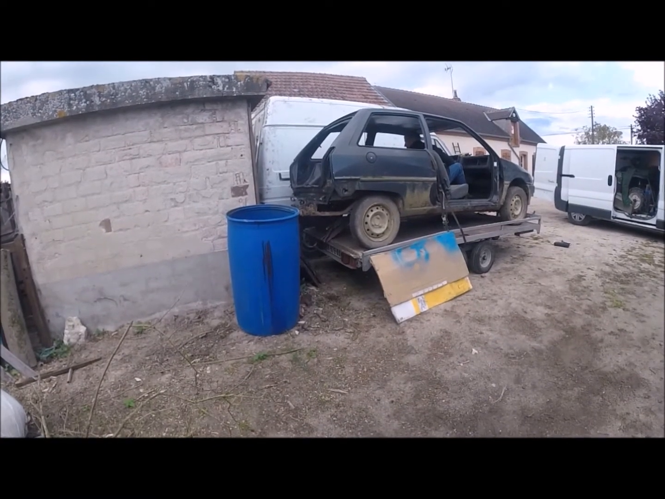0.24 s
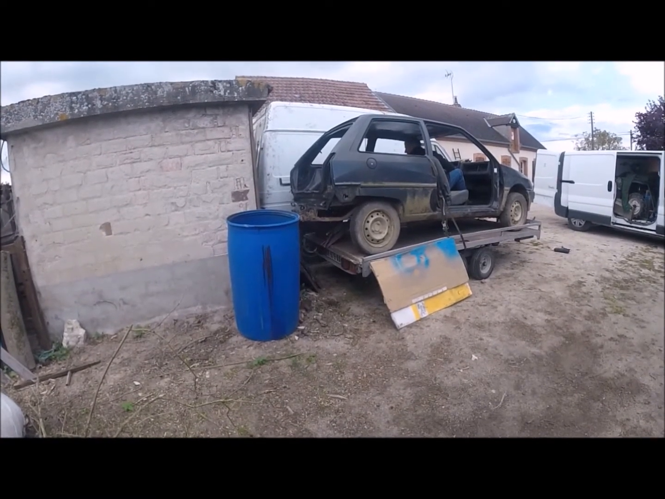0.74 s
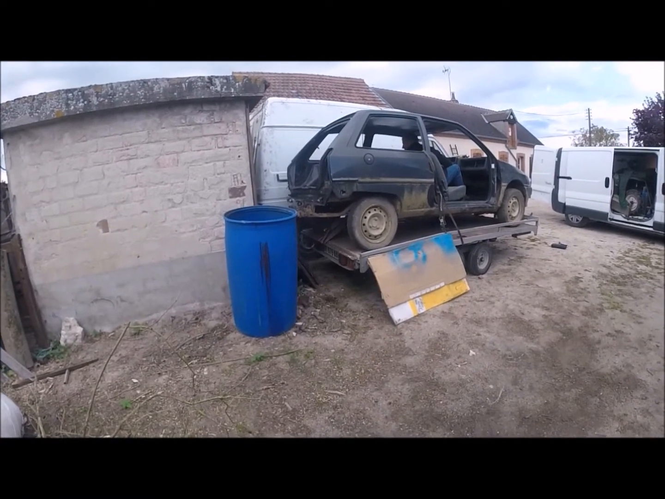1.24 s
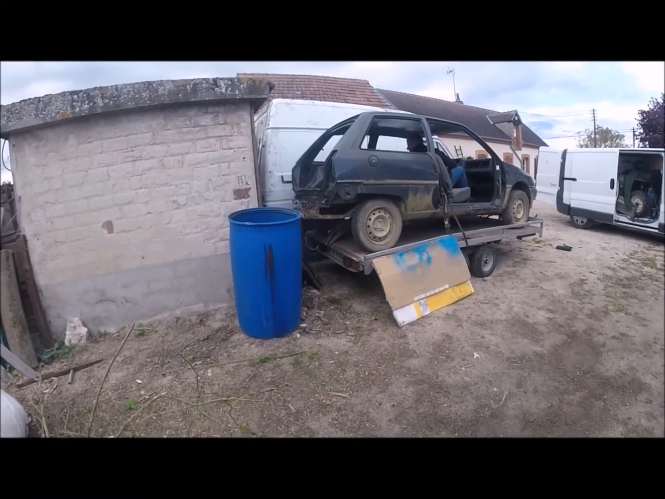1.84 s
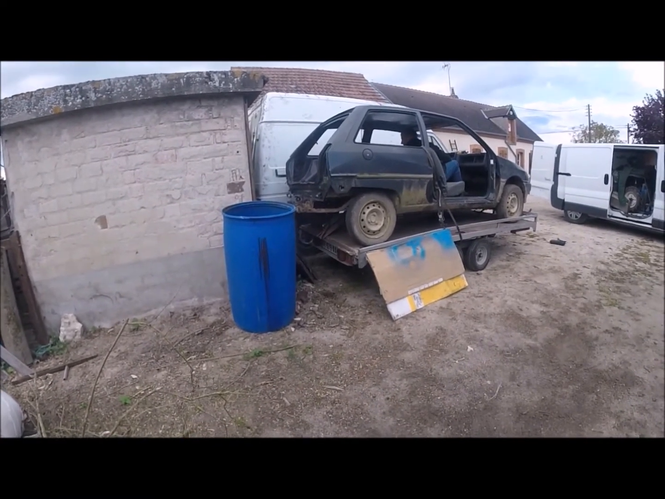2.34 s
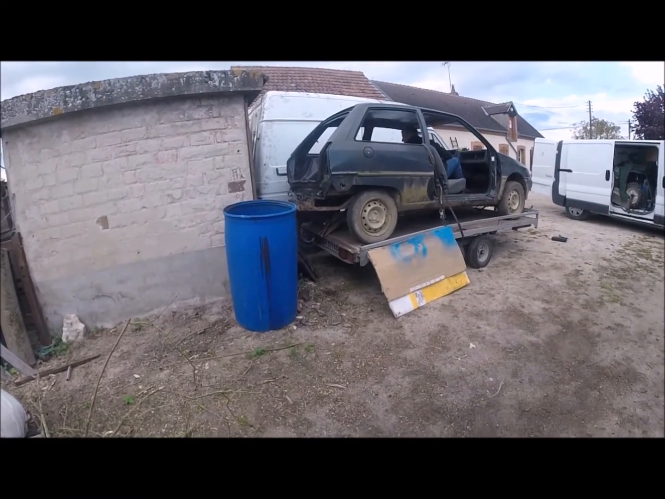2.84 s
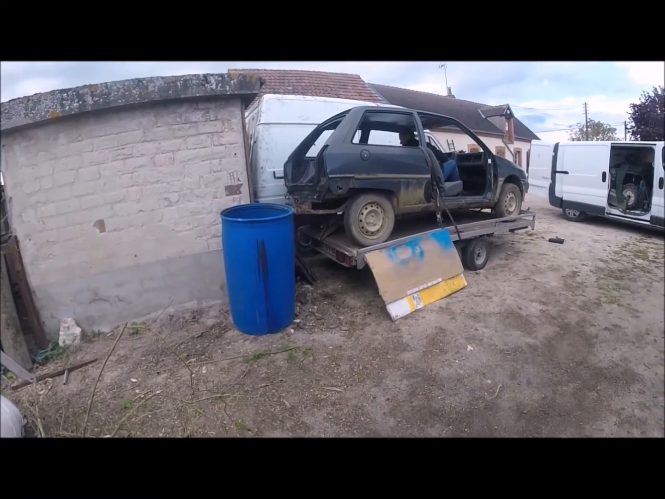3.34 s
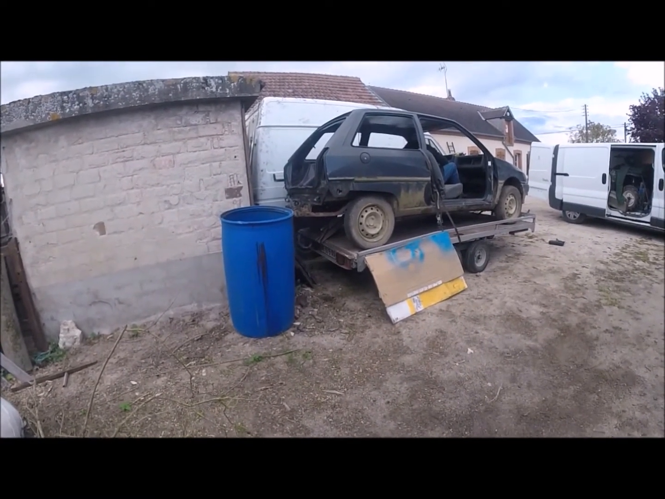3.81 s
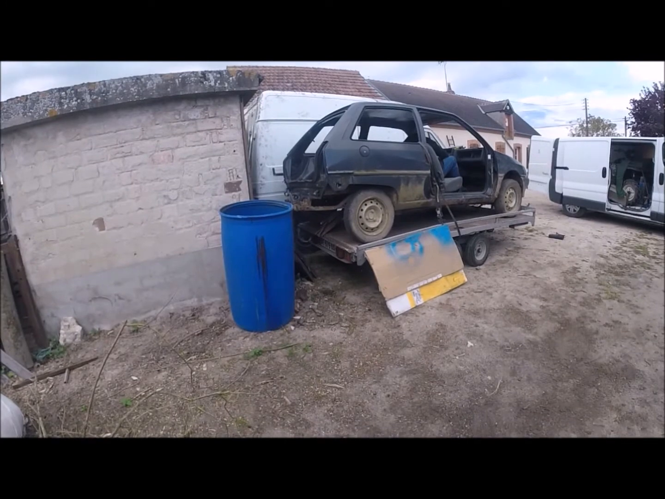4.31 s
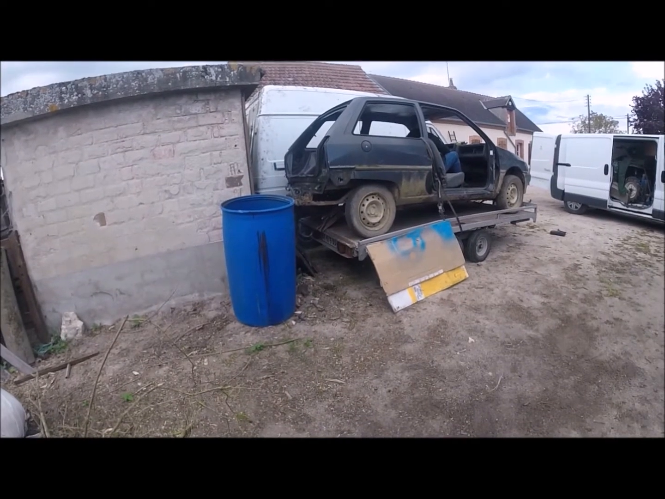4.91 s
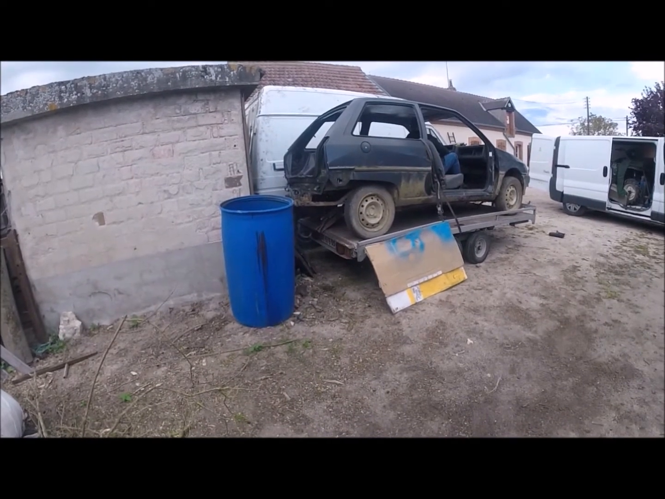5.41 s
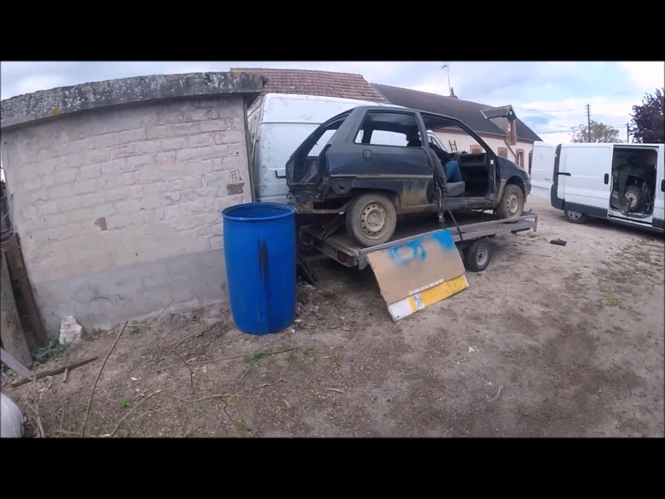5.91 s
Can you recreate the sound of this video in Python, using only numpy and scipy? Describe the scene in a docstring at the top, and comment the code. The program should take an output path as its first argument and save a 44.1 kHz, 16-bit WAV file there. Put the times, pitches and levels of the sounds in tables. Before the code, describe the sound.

Loud, torn exhaust noise from a bare small hatchback pulses on and off five times in under two seconds, each opening barking and sputtering. A long full-throttle pull follows, tense and metallic, nearly steady in pitch. Then it coasts, duller and quieter, sinking to a low throb before one last rough rev. A nearby microphone in an open yard catches a brief diffuse echo and light air.

```python
"""The open exhaust of a stripped four-cylinder hatchback on a trailer, revved in a walled yard: five short
stabs, a long pull, a coast down to about a third of the speed and one last blip.
Low orders of the firing rate boom as near-pure tones; surges of gas noise and pressure pulses rasp and growl.
Noise bursts ring the pipe as bangs, hard firings and sputters; a diffuse echo, still air and a breeze surround it."""
import sys
import numpy as np
from scipy import signal
from scipy.fft import rfft, irfft, next_fast_len
from scipy.io import wavfile
from scipy.ndimage import uniform_filter1d, map_coordinates

SR = 44100
rng = np.random.default_rng(int(sys.argv[2]) if len(sys.argv) > 2 else 0)


def transcribe(u):
    """Save the signal u as a 16-bit wav file named by the first command-line argument.

    u: samples, shape (n,) or (channels, n), limited to [-1, 1]; the rate is SR.
    q: integer samples, one column per channel.
    """
    v = np.clip(np.atleast_2d(u).T, -1, 1)
    q = np.round(v * 32767).astype(np.int16)
    wavfile.write(sys.argv[1], SR, q)


N = 271640


def amp(db):
    """Decibels to gain."""
    return 10 ** (np.asarray(db) / 20)


def unit(x):
    """Scale to rms 1."""
    return x / np.sqrt(np.mean(x ** 2) + 1e-20)


def along(points, hz):
    """Join (Hz, value) points on a log frequency axis and read them at hz."""
    f, v = np.transpose(points)
    return np.interp(np.log(hz + 1), np.log(f + 1), v)


def clock():
    """Time of each sample in seconds."""
    return np.arange(N) / SR


def wobble(rate):
    """A smooth random curve with rate knots a second."""
    knots = rng.standard_normal(int(N * rate / SR) + 4)
    return map_coordinates(knots, [clock() * rate])


def coloured(x, spectrum, resonances=()):
    """Minimum-phase filter: a smooth spectrum carrying resonances and notches."""
    size = 2 * next_fast_len(N // 2 + SR // 4)
    hz = np.fft.rfftfreq(size, 1 / SR)
    gain_db = along(spectrum, hz)
    for centre, width, db in resonances:
        gain_db = gain_db + db / (1 + (2 * (hz - centre) / width) ** 2)
    # folding the cepstrum forward in time makes the filter causal
    cepstrum = irfft(np.log(amp(gain_db)))
    cepstrum[1:size // 2] *= 2
    cepstrum[size // 2 + 1:] = 0
    response = np.exp(rfft(cepstrum))
    return irfft(rfft(x, size) * response, size)[:N]


# Throttle openings. Each row: opens in seconds, shuts in seconds, pull per second, strength at the start
# in dB, swell in dB, growl against the rasp in dB (before its later shaping), unevenness of the cylinders
# in dB, coasting level in dB.
THROTTLE = [(0, .325, 2.053, -30.5, 4.5, -13, 1.8, -1.5), (.512, 0.719, 1.69, -44, 17, -13, 2.5, -3.5),
            (.862, 1.066, 1.952, -30.5, 2.5, -10.5, 2, -2.5),
            (1.255, 1.44, 1.295, -38, 7, -10.5, 3.5, -3.5), (1.615, 1.806, 1.53, -33, 2, -12, 1.5, -5.5),
            (2.0, 3.61, 1.901, -28, 5, -13, -0.3, 0.5), (5.66, 5.996, 1.199, -26.5, 3.5, -7, 0.7, -2.5)]
START_HZ, FREE_HZ = 192.9, 252.7  # firing rate at first, and the rate an open throttle pulls toward
LIMIT_HZ, SAG_HZ_PER_S = 236.1, 2.46  # ceiling of the firing rate, sinking while the throttle is held
DRAG_PER_S = .545  # decay rate of the speed by friction while the throttle is shut


def speed():
    """Firing rate: climbs toward a ceiling with the throttle open, runs down by friction once it shuts."""
    t = clock()
    rate = START_HZ * np.exp(-DRAG_PER_S * t)
    for opens, shuts, pull, *_ in THROTTLE:
        held = np.clip(t, opens, shuts) - opens
        rate_at_opening = np.interp(opens, t, rate)
        climb = FREE_HZ - (FREE_HZ - rate_at_opening) * np.exp(-pull * held)
        ceiling = LIMIT_HZ - SAG_HZ_PER_S * held
        coast = np.exp(-DRAG_PER_S * np.maximum(t - shuts, 0))
        rate = np.where(t >= opens, np.minimum(climb, ceiling) * coast, rate)
    return rate


SWELL_S = 0.39  # the longest that an opening takes to reach its full strength


def throttle(release):
    """Openings swell, then fall 60 dB in release seconds; gives strength, and growl, unevenness, coast in dB."""
    t = clock()
    strength, character = np.zeros(N), np.zeros((3, N))
    for opens, shuts, _, start_db, swell_db, *settings in THROTTLE:
        swell = np.clip((t - opens) / min(shuts - opens, SWELL_S), 0, 1)
        fade_db = -60 * np.maximum(t - shuts, 0) / release
        strength = strength + (t >= opens) * amp(start_db + swell_db * swell + fade_db)
        character = np.where(t >= opens, np.array(settings)[:, None], character)
    return strength, *character


PIPE_ECHO = .00215  # round trip along the pipe (s)


def puff_shape(firings, rate, fall_db, echo_depth, uneven_db, scatter_db):
    """One gas surge per firing, sized by cylinder and chance, surging again after each trip along the pipe."""
    index = (firings - np.floor(firings[0])).astype(int)
    size_db = uneven_db * np.cos(np.pi / 2 * index) + scatter_db * rng.standard_normal(N)[index]
    phase = firings % 1
    age = phase / rate  # seconds since the firing
    echoes = 1 + echo_depth * np.cos(2 * np.pi * age / PIPE_ECHO)
    shape = amp(size_db - fall_db * phase) * echoes
    # keep the running power even, so that only the shape of the surges counts
    return shape / np.sqrt(np.abs(uniform_filter1d(shape ** 2, size=SR // 8)))


def blowdown(firings, rate, unlike, size=1024):
    """Each exhaust valve tears the gas the same way at every opening; the four are partly alike."""
    tear = rng.standard_normal(size) + unlike * rng.standard_normal((4, size))
    cylinder = np.floor(firings) % 4
    age_samples = firings % 1 / rate * SR
    return unit(map_coordinates(tear.ravel(), [cylinder * size + age_samples]))


def pulses(firings, half_db, quarter_db, scatter, count=160, size=8192):
    """Pressure wave of the four-stroke cycle; unequal cylinders add half and quarter orders."""
    k = np.arange(count)
    order = k / 4  # multiples of the firing rate
    whole, half = order % 1 == 0, order % .5 == 0
    between = np.where(half, amp(half_db), amp(quarter_db)) * (order > 1)
    level = np.where(whole, order > 3, between)  # boom() plays the lowest whole orders
    # high orders drift out of step on their way down the pipe
    phase = rng.standard_normal(count) * np.where(whole, scatter * order, np.pi)
    cycle = irfft(level * np.exp(1j * phase), size)
    return np.interp(firings / 4 % 1, np.arange(size) / size, cycle)


# Resonances and notches of the exhaust, shared by rasp, overrun and bangs.
# Each row: centre in Hz, width in Hz, gain in dB.
PIPE = [(333.6,67,-18),(502,207,9),(577,55,-15.5),(813,13,6.5),(893,21,9.5),(1058,129,-14),(1272,19.4,-21),(1469.6,112,13),(1536,53,5.5),(1935,170,-5.5),(2325,35,-15),
        (2780,316,6),(3165,64,5),(3382,92,6),(3490,93,8),(3790,197,-9.5),(4510,114,5.5),(5210,340,4),(6320,440,-7.5),(7315,135,8),(8300,510,-9.5)]
# Colour of the turbulent gas under load. Each row: frequency in Hz, relative level in dB per Hz.
LOAD_GAS = [(30,-35),(80,-29),(130,-6.5),(220,-20),(400,-7),(900,-5),(1700,-1),(3000,1.5),(5200,3.5),(7000,-5),(9500,-17),(12500,-41),(15500,-43)]
# Colour of the rasp that repeats with every cycle, also the ground of the ringing in thinned().
# Each row: frequency in Hz, relative level in dB per Hz.
BUZZ = [(200,-29),(500,-16),(900,-19.5),(1500,1),(3000,-4),(5200,0),(7000,-10.5),(9500,-18.5),(14000,-32.5)]
# Colour of the pressure pulses under load. Each row: frequency in Hz, relative level in dB.
PULSE = [(100, 16), (330, 8.5), (480, 10.5), (780, 12), (950, 11), (1250, 12.5), (1520, 10), (1900, 7.5),
         (2600, 7), (4000, 6.5), (6000, -24), (9000, -25)]


def under_load(firings, rate, strength, growl_db, uneven_db):
    """Open throttle: hard pulses and tearing gas; slow firings stand apart, fast ones fuse into a buzz."""
    fall_db = np.interp(rate, [85, 130, 230], [15, 11, 3])
    regular = np.interp(rate, [85, 200, 232], [.4, .55, .75])  # share of the rasp that repeats
    surge = puff_shape(firings, rate, fall_db, echo_depth=1.0, uneven_db=uneven_db, scatter_db=1.5)
    hiss = unit(coloured(surge * rng.standard_normal(N), LOAD_GAS, PIPE))
    buzz = unit(coloured(surge * blowdown(firings, rate, unlike=0.67), BUZZ, PIPE))
    rasp = np.sqrt(regular) * buzz + np.sqrt(1 - regular) * hiss
    wave = pulses(firings, half_db=-4, quarter_db=-11, scatter=.22) * np.sqrt(rate)
    # extra growl by speed: (firing rate Hz, dB)
    on_song = [(130, 4.2), (190, 5.6), (214, 1.5), (225, 7), (234, 5.6)]
    growl_level = amp(growl_db + along(on_song, rate) + 2.3 * wobble(50))
    growl = growl_level * unit(coloured(wave, PULSE, PIPE))
    return strength * thinned(rasp + growl, depth=1.0)


# Strength of the three low orders in the coasting wave, as the tailpipe favours some speeds.
# Each row: firing rate in Hz, level in dB before the coasting level and waver.
FIRST_ORDER = [(78, -47), (88, -54.5), (97, -37), (109, -40.5), (124, -37.5), (142, -35), (158, -36.5),
               (172, -31), (192, -40.5), (210, -39.5), (222, -38.5), (233, -44)]
SECOND_ORDER = [(76, -53), (89, -44.5), (110, -40.5), (124, -43.5), (138, -53), (165, -56), (187, -55.5),
                (205, -49), (232, -47.5)]
THIRD_ORDER = [(76, -49), (100, -70), (130, -50), (150, -56), (168, -39), (188, -68), (212, -57.5),
               (233, -57)]
# Combustion wave of each order at a load of 1. Its columns: first, second and third order, in multiples
# of the tabled strength.
LOAD_GAIN = (2.94, 5.5, 8.2)
LOAD_LAG, LOAD_LAW = 2.42, 0.78  # lag behind the coasting wave (radians); growth as a power of the load


def boom(firings, rate, load, coast_db, waver_db):
    """Three low orders as near-pure tones; combustion partly cancels, then overtakes the coasting wave."""
    tones = np.zeros(N)
    orders = zip((FIRST_ORDER, SECOND_ORDER, THIRD_ORDER), LOAD_GAIN)
    for k, (levels, gain) in enumerate(orders, 1):
        angle = 2 * np.pi * k * firings
        coasting = amp(coast_db) * np.sin(angle)
        combustion = gain * load ** LOAD_LAW * np.sin(angle - LOAD_LAG)
        level = amp(along(levels, rate) + waver_db * wobble(30))
        tones = tones + level * (coasting + combustion)
    return np.sqrt(2) * tones


# Decay of the yard's answer. Each row: frequency in Hz, time to fall 60 dB in seconds.
YARD = [(150,0.36),(1500,0.16),(5000,0.064),(14000,0.058)]


def yard(x):
    """Walls and vans return a short diffuse answer: decaying noise, duller as it fades."""
    hz, t, z = signal.stft(rng.standard_normal(SR // 2), SR, nperseg=256)
    decay = amp(-60 * t / along(YARD, hz)[:, None])
    tail = signal.istft(z * decay, SR, nperseg=256)[1]
    return signal.fftconvolve(x, tail / np.linalg.norm(tail))[:N]


# Colour of the quiet yard air. Each row: frequency in Hz, relative level in dB per Hz.
AIR = [(20,-2),(60,10),(130,8),(300,13),(1500,-29),(5000,-28),(15000,-46)]


def still_air(level_db):
    """Quiet air of the yard: steady noise, strongest in the lows."""
    return amp(level_db) * unit(coloured(rng.standard_normal(N), AIR))


# Low rumble of the air. Each row: time in seconds, level in dB before the gusts.
RUMBLE = [(0, -68), (3.8, -71), (4.7, -53), (5.1, -60), (5.6, -56)]


def breeze(gust_db):
    """Light air rumbles unevenly: low noise with a wandering level."""
    spectrum = [(15, -9), (55, 0), (110, -26), (250, -25), (1000, -52)]  # (Hz, dB per Hz)
    level_db = np.interp(clock(), *np.transpose(RUMBLE))
    rumble = unit(coloured(rng.standard_normal(N), spectrum))
    return amp(level_db + gust_db * wobble(9)) * rumble


# Colour of the gas on the overrun. Each row: frequency in Hz, relative level in dB per Hz.
COAST_GAS = [(30,-28),(150,11),(500,5.5),(900,8),(1700,10),(3000,5),(5200,4),(7000,-7),(10000,-19.5),(15000,-35)]
# Air pumped with the throttle shut. Each row: firing rate in Hz, level in dB before the rasp, growl and
# coasting levels.
PUMPING = [(76, -59.5), (89, -53.5), (127, -46), (172, -41), (200, -43.5), (225, -43.5)]


def overrun(firings, rate, rasp_db, growl_db):
    """Shut throttle: the engine only pumps air, softer and duller, and mostly fainter as it slows."""
    surge = puff_shape(firings, rate, fall_db=4, echo_depth=.2, uneven_db=2, scatter_db=1.8)
    gas = surge * (rng.standard_normal(N) + 0.35 * blowdown(firings, rate, unlike=0.73))
    rasp = amp(rasp_db) * unit(coloured(gas, COAST_GAS, PIPE))
    wave = pulses(firings, half_db=-3.5, quarter_db=-27, scatter=0.44) * np.sqrt(rate)
    # relative level of the soft pulses: (Hz, dB)
    soft_pulse = [(150, 10.5), (500, 5.0), (900, 5.5), (1600, -1.0), (3500, -5.0), (8000, -55)]
    growl = amp(growl_db) * unit(coloured(wave, soft_pulse, PIPE))
    return amp(along(PUMPING, rate)) * (rasp + growl)


# Noise bursts in the pipe: bangs at openings, hard single firings and sputters. Each row: start in seconds,
# level in dB before the common trim, time to fall 60 dB after the hold in seconds.
BANGS = [(0.512, -10, 0.012), (.6364, -22, 0.047), (.864, -17.5, 0.083), (1.2522, -23, 0.017),
         (1.255, -10.5, 0.01), (1.617, -23, 0.042), (1.6203, -16.5, 0.019), (1.63, -22, 0.019),
         (1.66, -24.5, .05), (1.702, -24, 0.041), (1.746, -19.5, 0.11), (1.792, -21.5, 0.061),
         (2.003, -18, 0.081), (2.089, -20, 0.033), (5.6596, -21.5, 0.027), (5.6734, -17.5, 0.013),
         (5.686, -21, .025), (5.711, -20.5, 0.061)]
# Colour of a burst. Each row: frequency in Hz, relative level in dB per Hz.
BANG_GAS = [(30,-8),(130,5),(500,4),(1500,5.5),(3000,6),(5200,6),(7500,-3.5),(10000,-14.5),(15500,-34)]


def bangs(hold, level_db):
    """Noise bursts that ring the pipe: bangs, hard firings and sputters, held briefly, then dying away."""
    t = clock()
    blast = np.zeros(N)
    for start, db, t60 in BANGS:
        fade_db = -60 * np.maximum(t - start - hold, 0) / t60
        blast = blast + (t >= start) * amp(db + fade_db)
    noise = rng.standard_normal(N)
    steady_level = np.std(coloured(noise, BANG_GAS, PIPE))
    return amp(level_db) * coloured(noise * blast, BANG_GAS, PIPE) / steady_level


# Moments when the rasp thins to a ring. Each row: centre in seconds, length in seconds, level of the ring
# in dB before the throttle strength.
THINNING = [(2.119, 0.04, 3.5), (2.195, 0.026, -1), (2.267, 0.016, -0.5), (2.506, 0.015, 1.5),
            (2.564, 0.029, 1), (2.597, .02, -2.5), (2.785, 0.012, -1.5), (2.847, 0.011, -2),
            (3.049, 0.04, -4)]
# Pitches of the ring. Each row: centre in Hz, width in Hz, gain in dB.
RING = [(1475,160,34.5),(2670,130,31),(2870,170,28),(3052,91,34),(3454,81,32),(4524,130,31),(4750,120,29.5),(5230,78,29),(7300,83,28.5)]


def thinned(rasp, depth):
    """For moments the rasp gives way to a few ringing pitches, made of noise through narrow resonances."""
    t = clock()
    windows = [(np.exp(-(2 * (t - centre) / length) ** 4), db) for centre, length, db in THINNING]
    share = np.clip(depth * sum(window for window, db in windows), 0, 1)
    ring = unit(coloured(rng.standard_normal(N), BUZZ, RING))
    ring_level = sum(amp(db) * np.sqrt(window) for window, db in windows)
    return np.sqrt(1 - share) * rasp + ring_level * ring


FIRING_AT = 5.6595  # one firing falls at this time (s)
FULL_LOAD_DB = -21.5  # throttle strength that counts as a load of 1


def scene():
    """The throttle sets speed and load, which drive the exhaust; its echo and the air join in."""
    rate = speed()
    strength, growl_db, uneven_db, coast_db = throttle(release=0.072)
    # the running count of firings, with a slight unsteadiness of speed
    turns = np.cumsum(rate * (1 + .0025 * wobble(35))) / SR
    firings = turns - np.interp(FIRING_AT, clock(), turns)
    exhaust = under_load(firings, rate, strength, growl_db, uneven_db)
    exhaust = exhaust + amp(coast_db) * overrun(firings, rate, rasp_db=2, growl_db=1.0)
    exhaust = exhaust + bangs(hold=0.0036, level_db=-2)
    tones = boom(firings, rate, strength / amp(FULL_LOAD_DB), coast_db, waver_db=1.5)
    air = still_air(level_db=-60.5) + breeze(gust_db=6)
    return (exhaust + amp(-8.5) * yard(exhaust) + tones + air)[None]


TOP_HZ = 15350


def record(dry):
    """Soft saturation rounds off the highest peaks; a steep low-pass then removes all from TOP_HZ up."""
    rounded = dry / (1 + (np.abs(dry) / .5) ** 6) ** (1 / 6)
    size = next_fast_len(N + SR // 2)
    band = np.fft.rfftfreq(size, 1 / SR) < TOP_HZ
    return irfft(rfft(rounded, size) * band, size)[:, :N]


dry = scene()
out = record(dry)
transcribe(out)
```